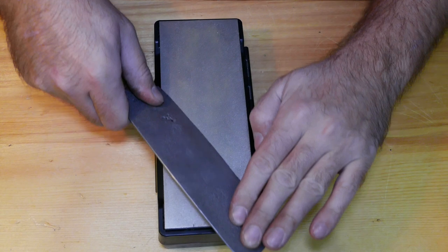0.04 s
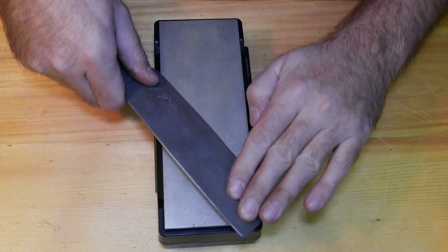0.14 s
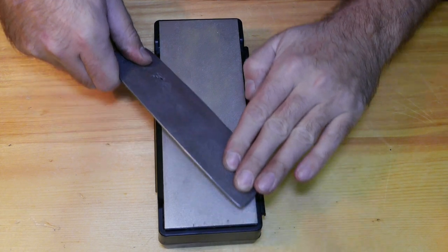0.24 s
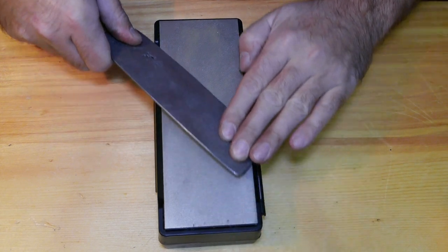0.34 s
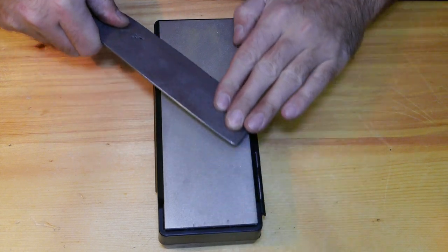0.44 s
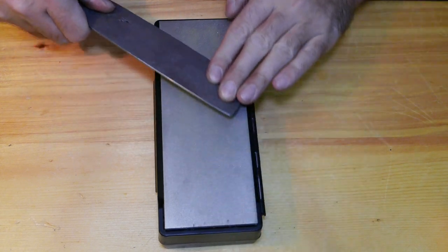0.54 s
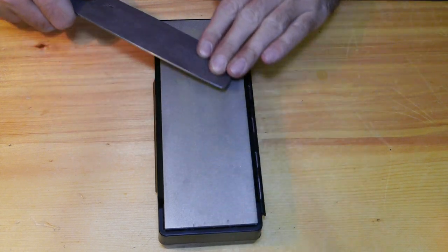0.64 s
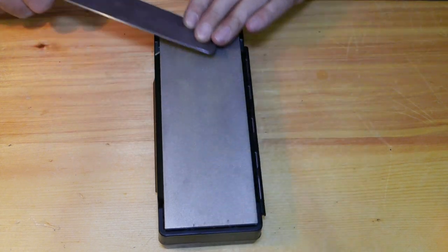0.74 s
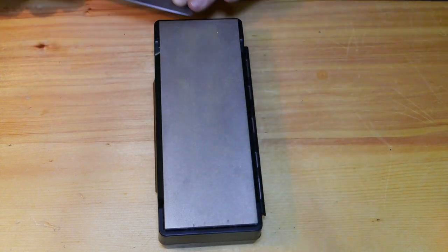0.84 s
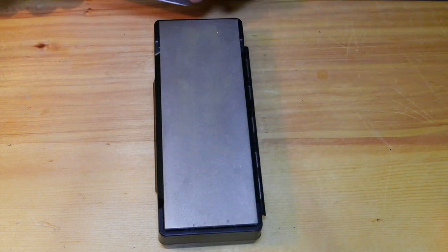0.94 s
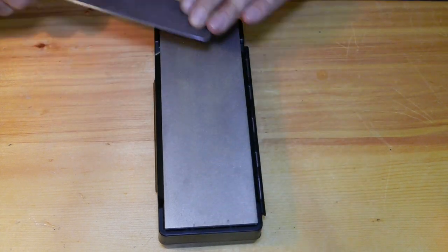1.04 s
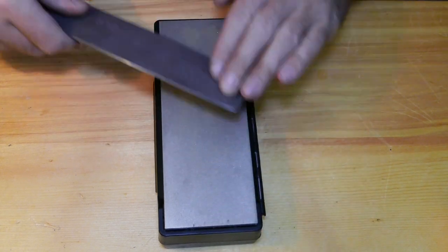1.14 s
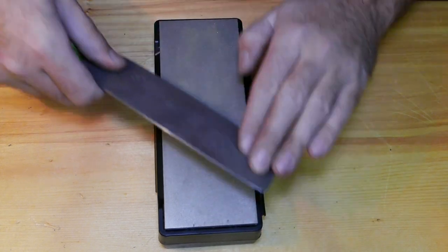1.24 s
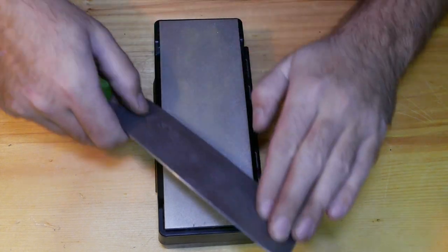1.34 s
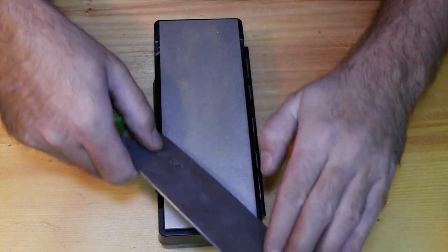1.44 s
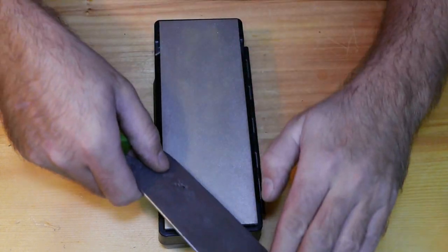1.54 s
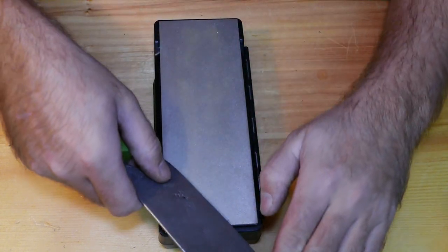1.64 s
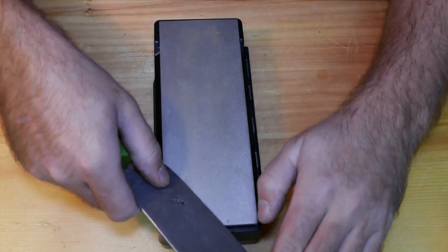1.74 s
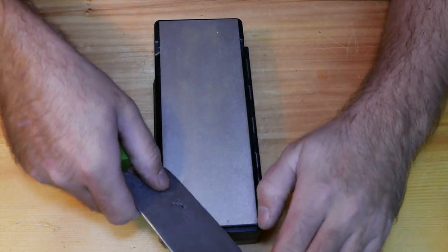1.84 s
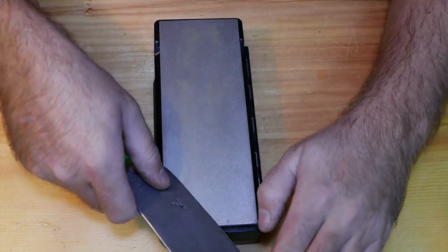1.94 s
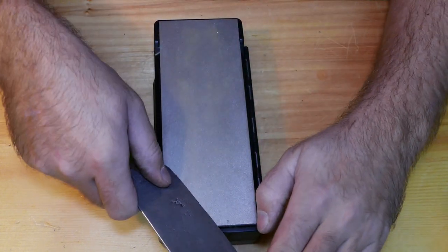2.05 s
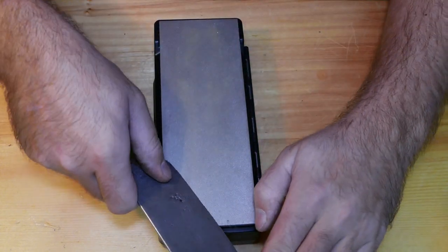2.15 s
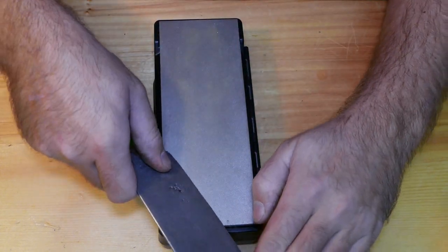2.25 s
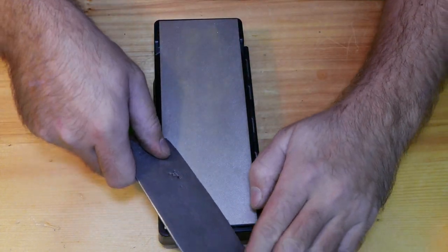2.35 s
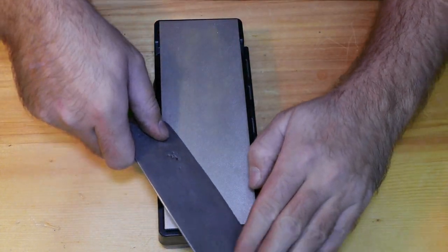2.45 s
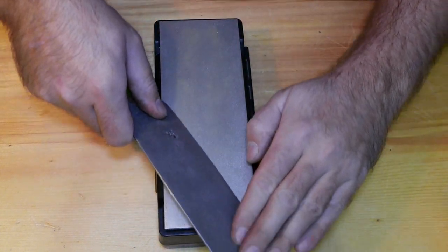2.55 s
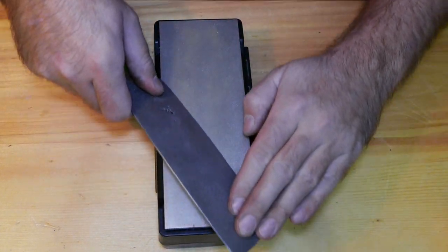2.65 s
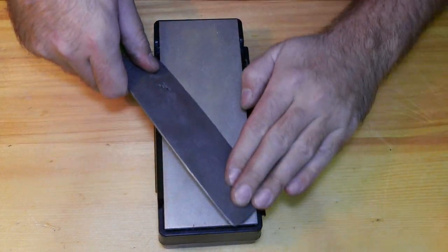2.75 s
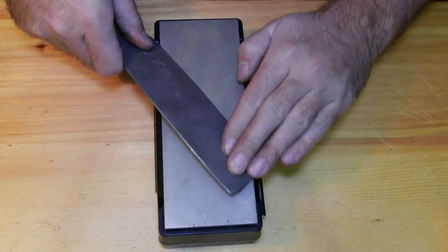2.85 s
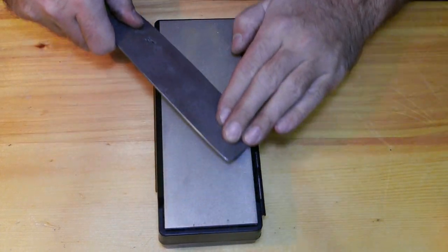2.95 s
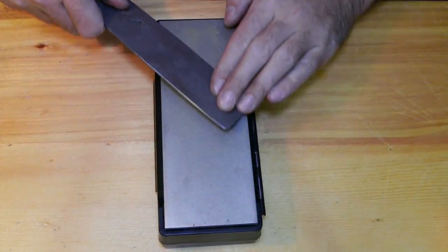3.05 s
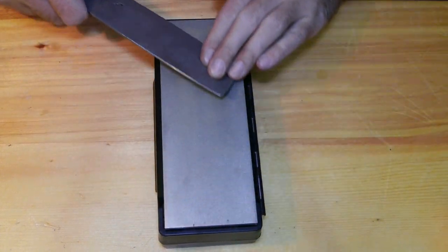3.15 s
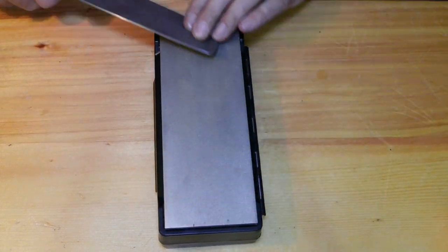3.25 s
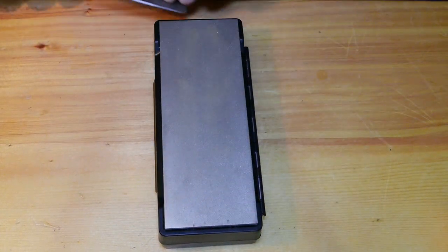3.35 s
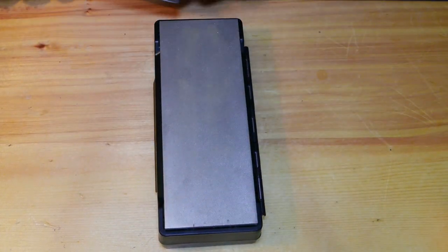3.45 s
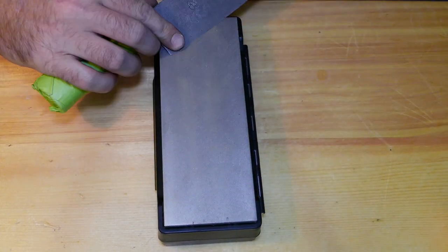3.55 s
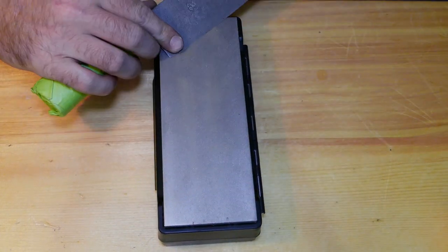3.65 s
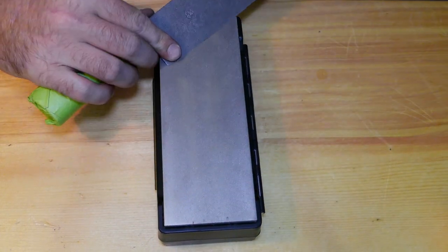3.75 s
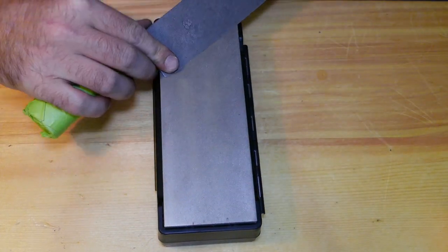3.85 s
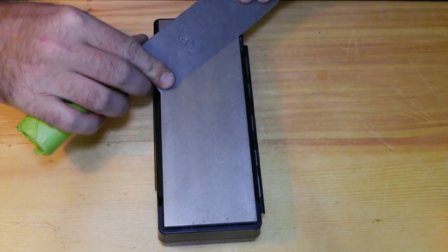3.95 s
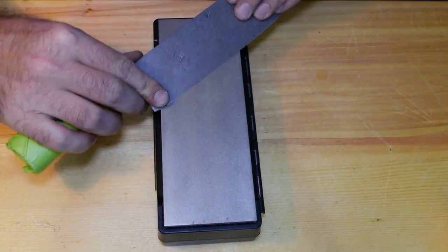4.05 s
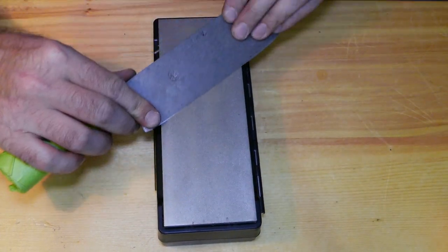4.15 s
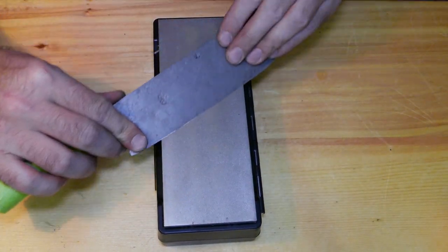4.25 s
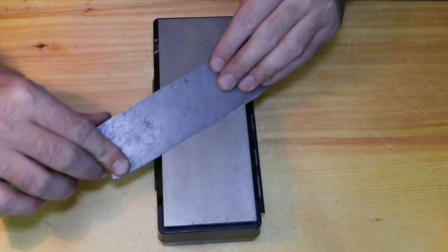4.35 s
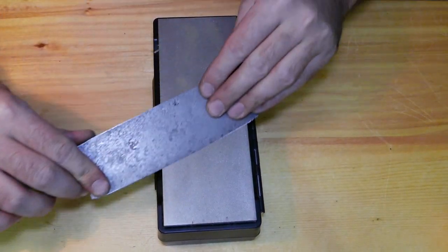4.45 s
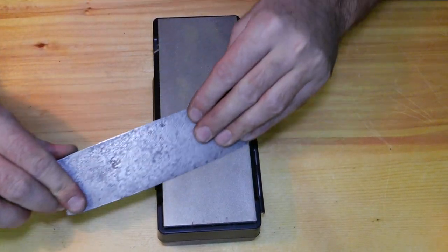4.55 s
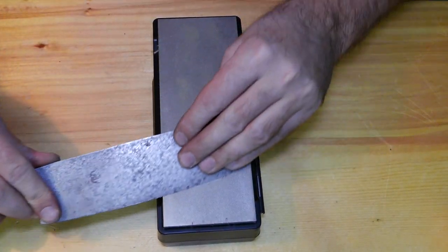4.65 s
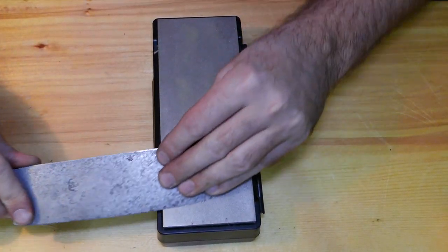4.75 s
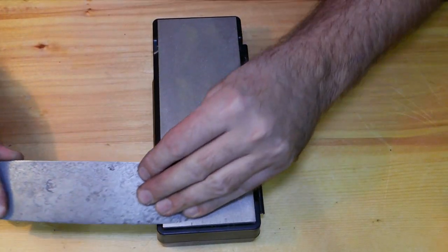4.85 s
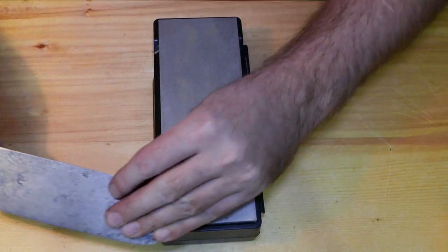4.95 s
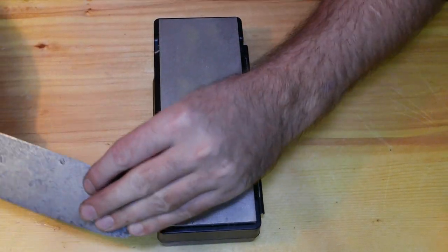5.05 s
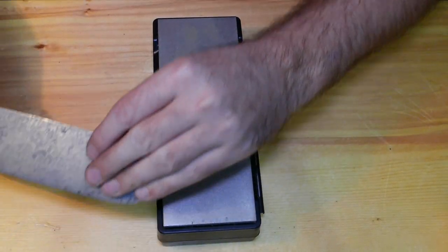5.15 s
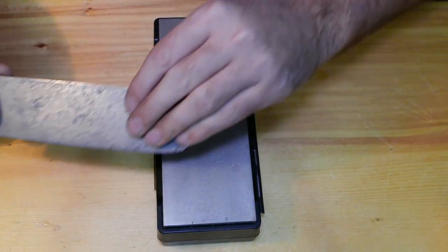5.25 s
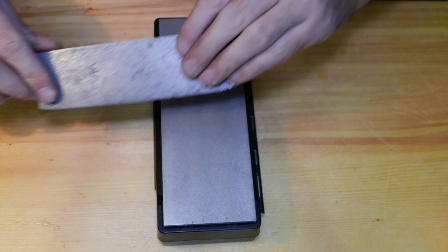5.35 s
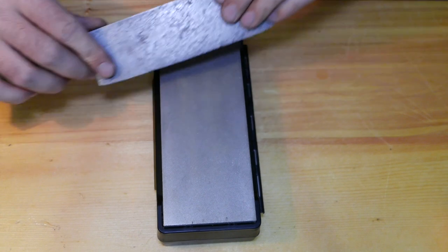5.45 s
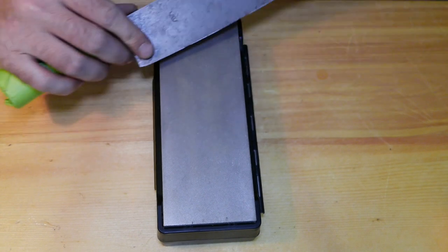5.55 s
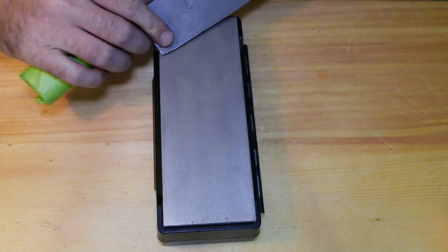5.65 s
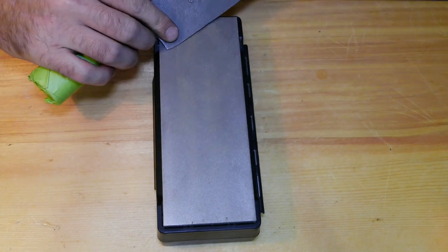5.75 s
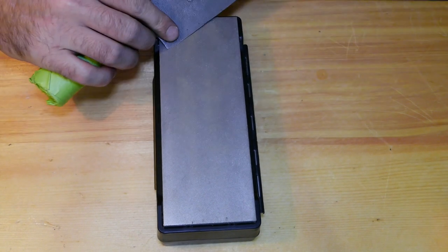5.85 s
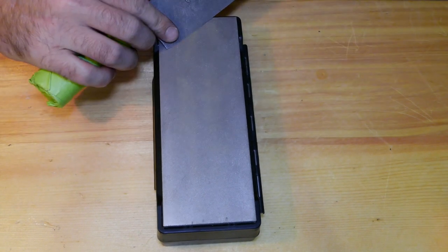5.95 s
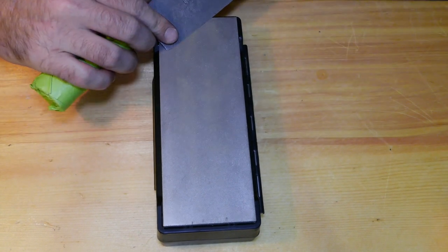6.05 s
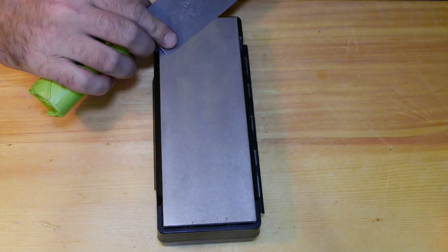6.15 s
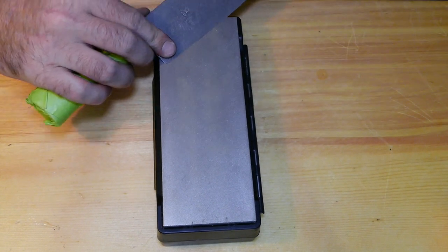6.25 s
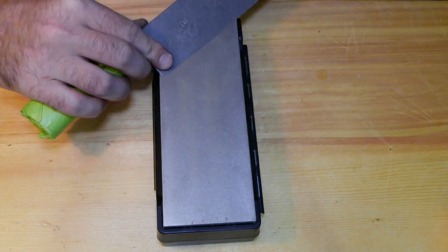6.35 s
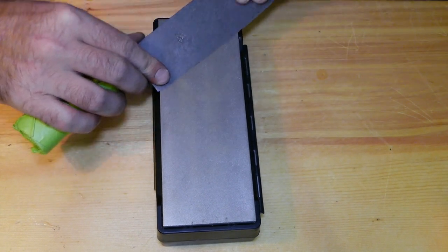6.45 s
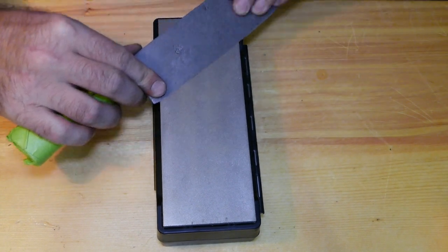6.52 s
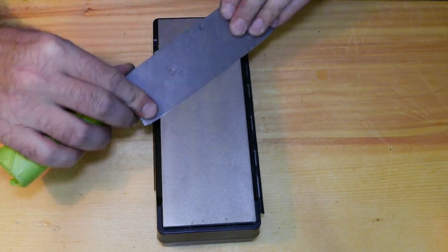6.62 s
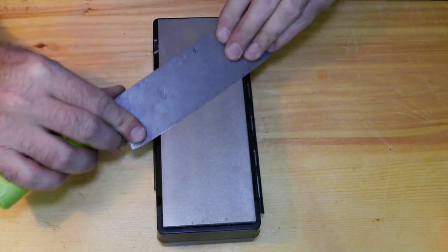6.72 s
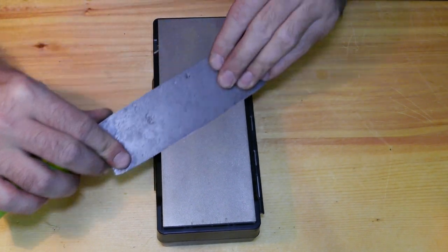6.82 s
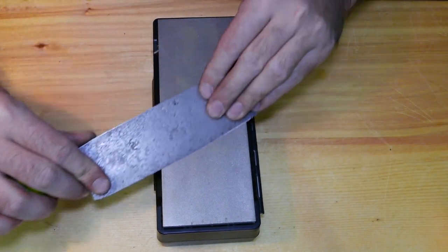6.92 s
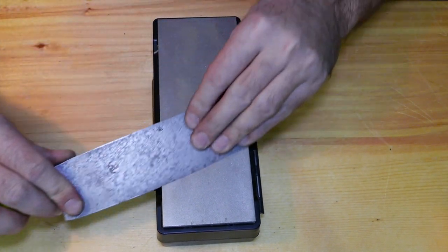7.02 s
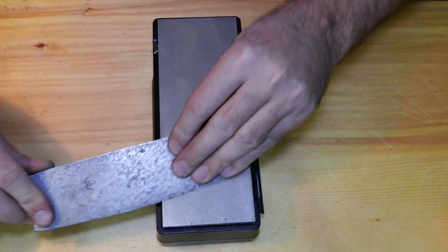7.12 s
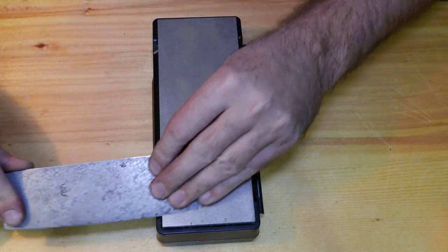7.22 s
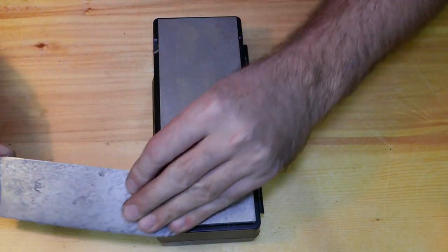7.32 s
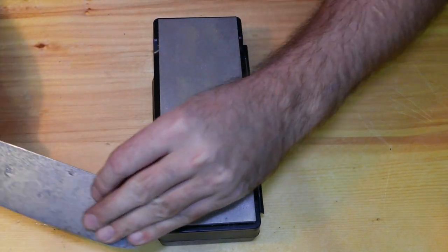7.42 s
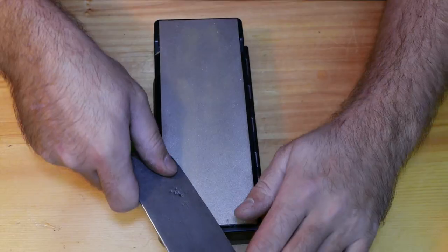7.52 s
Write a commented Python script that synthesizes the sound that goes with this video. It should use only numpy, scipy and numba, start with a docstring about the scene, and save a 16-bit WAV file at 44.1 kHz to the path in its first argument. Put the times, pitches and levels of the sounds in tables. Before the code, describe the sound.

Slow metallic rasps of a blade on a diamond plate, ringing and squeaking toward the tip, with small knocks and a soft room rush between.

```python
"""A steel kitchen knife is drawn heel to tip over a diamond plate on a wooden bench, twice on each face.
Random grit plucks excite the blade's resonances, which shift as the contact travels towards the tip.
The edge squeals now and then; filtered plucks make the bench rumble under the plate.
When the knife lands or slips off, decaying tones ring the blade and thump the bench, with a noise tick.
The hands rub softly; a small room adds echoes, a fan-like rush of filtered noise and a wavering hum."""
import sys
import numpy as np
from scipy import signal
from scipy.fft import rfft, irfft, next_fast_len
from scipy.io import wavfile
from scipy.ndimage import uniform_filter1d
from numba import njit

SR = 44100
rng = np.random.default_rng(int(sys.argv[2]) if len(sys.argv) > 2 else 0)


def log_audio(samples):
    """Write samples as a 16-bit WAV file to the path given in sys.argv[1]."""
    # one column per channel
    frames = np.atleast_2d(samples).T
    # limit to full scale, then quantise
    limited = np.clip(frames, -1, 1)
    pcm = np.round(limited * 32767).astype(np.int16)
    wavfile.write(sys.argv[1], SR, pcm)


N = 334278
TIME = np.arange(N) / SR  # seconds


def undb(db):
    """Turn decibels into a gain."""
    return 10 ** (np.asarray(db) / 20)


def unit(x):
    """Scale to an rms level of 1."""
    return x / np.sqrt(np.mean(x ** 2))


def ramp(t, start_s, length_s):
    """Rise in a straight line from 0 to 1 over a given time."""
    return np.clip((t - start_s) / length_s, 0, 1)


def walk(count, rate):
    """Smooth random wander with spread 1; rate is in new random values per second."""
    knots = np.arange(count) * rate / SR
    return unit(np.interp(knots, np.arange(count), rng.standard_normal(count)))


def steady(x):
    """Even out the slow level to 1 (over about 40 ms) and keep the grain."""
    slow_power = uniform_filter1d(x ** 2, size=1765)
    return x / np.sqrt(slow_power + 1e-18)


def colour(x, points):
    """Shape the spectrum along (Hz, dB) points, joined by lines on a log pitch scale."""
    size = next_fast_len(x.shape[-1])
    hz, db = np.transpose(points)
    bins_hz = np.arange(size // 2 + 1) * SR / size
    gain = undb(np.interp(np.log(bins_hz + 1), np.log(hz), db))
    return irfft(rfft(x, size) * gain, size)[..., :x.shape[-1]]


@njit
def resonate(x, hz, width):
    """A resonance whose centre can move: a state-variable band-pass with gain 1 at the centre."""
    out, band, low = np.empty(len(x)), 0., 0.
    for i in range(len(x)):
        g = np.tan(np.pi * hz[i] / SR)
        damping = width / hz[i]
        v = (band + g * (x[i] - low)) / (1 + g * (g + damping))
        band = 2 * v - band
        low = low + 2 * g * v
        out[i] = damping * v
    return out


def grit(count, grains_per_s=22000, spread_db=1.72, judder_db=0.66, judder_rate=170):
    """Diamond points pluck the edge, a few much harder than the rest; the edge sticks and slips over them."""
    hit = rng.random(count) < grains_per_s / SR
    size = undb(spread_db * np.minimum(rng.exponential(size=count), 5))
    judder = undb(judder_db * walk(count, judder_rate))
    return hit * size * rng.standard_normal(count) * judder


def overtones(count=100, reach=0.036, width_hz=95, low_lift_db=5.5, high_lift_db=10.0,
              tip_lift_db=3.0, glide_hz=1200, tip_fall_hz=4500, scatter_hz=90):
    """Many weaker high modes, each on a short stretch of edge; near the tip they sing out and slide down."""
    places, slopes, shifts = rng.uniform([0, -1, -1], 1, (count, 3)).T
    centres = np.linspace(3300, 14600, count) + scatter_hz * shifts
    near_tip = ramp(places, .7, 0.13)  # along the edge here, not in time
    lifts = np.interp(centres, [4500, 8000], [low_lift_db, high_lift_db]) + tip_lift_db * near_tip
    glides = glide_hz * slopes - tip_fall_hz * near_tip * rng.random(count)
    # same columns as the blade faces in strokes()
    return [(place, reach, hz, glide, width_hz, db)
            for place, hz, glide, db in zip(places, centres, glides, lifts)]


def scrape(place, face, hiss_db, direct_db):
    """Grit excites the blade; each resonance swells and glides as the contact passes its place."""
    # Colour of the scrape as a whole. Each row: pitch in Hz, level in dB.
    steel_colour = [(300, -41.5), (560, -11), (750, -9), (1100, -1.86), (2500, -0.74), (3800, -2),
                    (5200, 0), (6300, -0.3), (7400, -5.5), (8300, -4.5), (9900, 0), (12500, -3),
                    (14500, -7), (16000, -14.8)]
    plucks = grit(len(place))
    steel = undb(direct_db) * plucks
    for best, reach, hz, glide, width, db in face:
        near = np.abs(place - best) < 3.5 * reach
        offset = place[near] - best
        swell = np.exp(-.5 * (offset / reach) ** 2)
        centre = np.clip(hz + glide * offset, 300, 15000)
        steel[near] += (undb(db) - 1) * resonate(plucks[near] * swell, centre, float(width))
    steel = colour(steel, steel_colour)
    # the blade's body sings below 6.8 kHz; the cutting points hiss above it
    body = signal.sosfiltfilt(signal.butter(6, 6800, fs=SR, output="sos"), steel)
    return steady(body) + undb(hiss_db) * steady(steel - body)


def catches(t):
    """The edge bites harder for a moment, or skips: short smooth bumps in dB for blade and bench."""
    # Moments of catching or skipping. Each row: middle in seconds, length in seconds,
    # change of the blade in dB, change of the bench in dB.
    moments = [(0.36, 0.16, 1.5, 0), (0.5, .06, 0, 0), (0.588, 0.04, -2, -4), (0.625, .025, 0, -3),
               (2.153, .04, -5, -7), (2.196, .04, 4.5, -0.5), (2.238, 0.043, 0, -6), (2.28, 0.072, 4, 1),
               (2.394, 0.13, 0.5, -3.5), (2.596, 0.017, 4, -4), (2.91, 0.026, 2.5, -2),
               (3.223, .025, 3, -5), (3.713, 0.11, -10, -0.5), (3.816, 0.065, 0.5, 2),
               (4.224, 0.02, -1, -9), (4.307, 0.041, 0, 2.5), (4.442, 0.038, -4, -2),
               (4.63, 0.047, 0, -3.5), (4.817, 0.051, -1, 7), (4.91, 0.068, -1, 6),
               (4.977, 0.027, 3.5, 1.5), (6.17, 0.085, 1, 0.5), (6.345, 0.11, 4, -1), (6.854, 0.052, 3, 2),
               (7.217, 0.058, 2.5, 1)]
    return sum(np.outer(lifts, np.exp(-(2 * (t - s) / length_s) ** 2))
               for s, length_s, *lifts in moments)


def bench_rumble(count, wood, groan_db, eased):
    """Grit shakes the bench through the plate; the plate holder groans as the weight reaches its end."""
    # Colour of the groan. Each row: pitch in Hz, level in dB.
    groan_colour = [(100, -38.5), (200, -11), (270, 3), (315, -8.5), (420, -16.5), (700, -35.5),
                    (2000, -59)]
    groan = undb(groan_db) * eased * steady(colour(grit(count), groan_colour))
    return steady(colour(grit(count), wood)) + groan


def strokes():
    """Four passes from heel to tip; speed and pressure set the blade's scrape, its hiss and the rumble."""
    # A stroke swells as the hand speeds up, holds, eases as the handle lifts for the curve of the edge,
    # and flares as the tip bites. Each row: touch in seconds, length in seconds, swell in seconds,
    # swell exponent, scrape level in dB, easing starts this many seconds before the end,
    # easing lasts in seconds, easing change in dB, holder's groan in dB relative to the rumble,
    # tip flare in dB, flare rises in seconds, flare holds in seconds, hiss in dB relative to the scrape,
    # the same in the flare, release in seconds, first and last place from heel 0 to tip 1,
    # lead at mid-stroke in edge lengths.
    passes = [(-.46, 1.32, 0.77, 1.7, -22.5, 0.22, 0.034, -7.5, -9.5, 5.9, 0.082, 0.026, -7.5, -2.5, 0.0067, 0.036, 0.97, -0.0088),
              (2.1, 1.269, 0.9, 1.77, -21.5, 0.13, 0.0073, -8, -14, 7.2, 0.071, 0.005, -7.5, 3.5, 0.0039, 0.0039, 0.96, -0.0066),
              (3.66, 1.3725, 0.64, 1.15, -23.5, 0.34, 0.16, -6.5, 0, 7.8, 0.07, 0.015, -7, -6.5, 0.025, 0.052, 0.95, 0.029),
              (6.135, 1.337, 0.8, 1.38, -21.5, 0.42, 0.27, -10, -1, 7, 0.05, 0.058, -6.5, -6, 0.0032, 0.062, 0.99, 0.00059)]
    # Blade resonances on each face. Each row: place where strongest from heel 0 to tip 1,
    # reach in edge lengths, pitch there in Hz, glide in Hz per edge length, width in Hz, lift in dB.
    first_face = [(0.876, 0.026, 760, 760.5, 95, 9.5), (0.1, 0.21, 820, -510, 160, 16.5),
                  (0.424, 0.05, 894, 1900, 100, 13), (0.6, 0.044, 1070, 500, 80, 10),
                  (0.69, 0.12, 1170, 460.5, 55, 11), (0.96, 0.077, 1220, 61, 32, 17.5),
                  (0.12, 0.22, 1240, -170, 61, 19.5), (0.15, 0.21, 1240, 620, 90, 16.5),
                  (0.42, 0.14, 1520, 719.5, 100, 18), (0.47, 0.095, 2200, 699, 250, 4.5),
                  (0.636, 0.11, 1540, -690, 56, 12), (0.9, 0.026, 1850, -2360, 200, 11.5),
                  (0.26, 0.28, 1960, 424.5, 120, 6.5), (0.15, 0.17, 2010, 569, 34, 16.5),
                  (0.52, 0.13, 2450, 412, 310, 8), (0.83, 0.039, 2776, -2500, 130, 17.5),
                  (0.18, 0.16, 2850, 499.5, 92, 13), (0.52, 0.07, 2960, 499, 89, 15.5),
                  (0.71, 0.08, 3020, -81, 62, 13), (0.91, 0.028, 3290, -970, 150, 12.5),
                  (0.777, 0.035, 3490, 0, 100, 12), (0.23, 0.05, 3620, 210, 76, 14),
                  (0.93, 0.054, 3830, -2080, 360, 12.5), (0.81, 0.05, 4130, -300, 120, 12.5),
                  (0.87, 0.035, 4300, -3500, 65, 12), (0.86, 0.049, 5150, -3500, 90, 9.5),
                  (0.87, 0.025, 3450, -3000, 63, 12.5), (0.49, 0.074, 4620, 599.5, 90, 16.5),
                  (0.46, 0.2, 5740, 99, 260, 9.5), (0.66, 0.063, 5830, -500, 300, 7),
                  (0.14, 0.065, 5750, -51, 120, 11.5), (0.806, 0.05, 5800, 930.5, 98, 13.5),
                  (0.65, 0.077, 7100, 369, 450, 8), (0.15, 0.33, 8400, 100.5, 250, 10.5),
                  (0.16, 0.3, 9100, 719.5, 350, 8), (0.72, 0.085, 10540, 1314.5, 190, 13.5),
                  (0.57, 0.06, 8900, -1, 200, 8.5), (0.68, 0.14, 7600, -0.5, 400, 4.5),
                  (1, 0.037, 9000, 1, 230, 13.5)]
    second_face = [(0.19, 0.61, 705, -460, 132, 15.4), (0.32, 0.026, 800, 180.5, 170, 9.5),
                   (0.01, 0.11, 1100, 224, 730, 17.7), (0.83, 0.035, 964, -9, 74, 7.8),
                   (0.16, 0.41, 1160, 100, 154, 9.2), (0.895, 0.08, 1187, 199, 95, 16),
                   (0.33, 0.088, 1540, 679, 290, 14.2), (0.14, 0.13, 1930, 152, 110, 9),
                   (0.28, 0.129, 1990, 382, 80, 16), (0.9, 0.035, 1820, 1680, 340, 7.1),
                   (0.55, 0.11, 2100, -510, 220, 16.7), (0.686, 0.056, 2170, -1000, 73, 19.8),
                   (0.43, 0.072, 2490, 90, 180, 15.4), (0.74, 0.054, 2734, -530, 145, 18.6),
                   (0.24, 0.14, 2770, -400, 140, 13.6), (0.52, 0.16, 2900, 99, 190, 13.5),
                   (0.89, 0.024, 3314, 754, 400, 11), (0.82, 0.075, 3800, -1710, 210, 9.2),
                   (0.14, 0.23, 3200, -360, 140, 8.4), (0.27, 0.067, 3930, 16, 66, 16),
                   (0.14, 0.12, 9750, 0, 340, 6.7), (0.63, 0.084, 4400, 269, 340, 5.5),
                   (0.626, 0.057, 5150, 3000, 300, 10), (0.26, 0.13, 5500, 700, 200, 9.5),
                   (0.796, 0.04, 4570, 0, 180, 8.1), (0.73, 0.026, 5640, 2500, 200, 13.3),
                   (0.64, 0.042, 7900, 230, 180, 4.1), (0.68, 0.12, 8700, 2230, 89, 3.3),
                   (0.855, 0.03, 12780, -1360, 300, 12)]
    # Colour of plate holder and bench top under each face's grip. Each row: pitch in Hz, level in dB.
    first_bench = [(30, -35.5), (60, -41), (90, -15), (112, -18), (142, 1.5), (175, 1), (205, -4), (232, 1),
                   (278, 1), (325, -11.5), (375, -8.5), (470, -7.5), (600, -31.5), (1200, -42)]
    second_bench = [(30, -35), (60, -36), (88, -20.5), (108, -11), (135, 2.5), (168, 1.5), (205, -6.5),
                    (232, -2), (272, -3), (322, -19.5), (375, -13), (470, -15), (600, -18), (1200, -47)]
    first_touch = 0.054  # share of the full scrape amplitude before the hand speeds up
    land_s, bench_land_s = 0.047, 0.062  # blade and bench sounds fade in as the edge settles
    skim_hiss_db, skim_s = 6.5, 0.1  # extra hiss, fading out, while the edge only skims the grit
    bare_db, bare_flare_db = -1, -3  # plucks between the resonances; their change as the tip bites
    hiss_speed_db, eased_hiss_db = 2, -2.5  # change at full speed; level under eased pressure
    rumble_db, rumble_speed_db, lean_db = -36, -3, 0.5  # at rest; change at full speed, as handle lifts
    waver_db, rumble_waver_db, waver_rate = 0.71, 1.85, 36  # unsteady hand pressure; changes per second

    blade, bench = np.zeros(N), np.zeros(N)
    grips = 2 * [(first_face, first_bench)] + 2 * [(second_face, second_bench)]
    for row, (face, wood) in zip(passes, grips):
        (touch, length, swell_s, power, db, ease_lead_s, ease_s, ease_db, groan_db,
         flare_db, rise_s, hold_s, grit_hiss_db, tip_hiss_db, release_s, first, last, lead) = row
        end = touch + length
        span = (TIME >= touch) & (TIME < end + 10 * release_s)
        t = TIME[span]
        # the hand's motion
        progress = ramp(t, touch, length)
        place = first + (last - first) * progress + lead * np.sin(np.pi * progress)
        speed = ramp(t, touch, swell_s)
        eased = ramp(t, end - ease_lead_s, ease_s)
        flare = ramp(t, end - hold_s - rise_s, rise_s)
        release = np.exp(-np.maximum(t - end, 0) / release_s)
        bite_db, shudder_db = catches(t)
        # the blade
        drive = ramp(t, touch, land_s) * (first_touch + (1 - first_touch) * speed ** power)
        blade_db = db + ease_db * eased + flare_db * flare + bite_db
        blade_db = blade_db + waver_db * walk(len(t), waver_rate)
        hiss_db = (1 - eased) * (grit_hiss_db + hiss_speed_db * speed)
        hiss_db = hiss_db + (eased - flare) * eased_hiss_db + flare * tip_hiss_db
        hiss_db = hiss_db - bite_db / 2  # a catch rings the blade more than it adds hiss
        skim_db = skim_hiss_db * (1 - ramp(t, touch, skim_s))
        direct_db = bare_db + bare_flare_db * flare
        steel = scrape(place, list(face) + overtones(), hiss_db + skim_db, direct_db)
        blade[span] += drive * release * undb(blade_db) * steel
        # the bench
        bench_db = rumble_db + rumble_speed_db * speed + lean_db * eased + shudder_db
        bench_db = bench_db + rumble_waver_db * walk(len(t), waver_rate)
        rumble = bench_rumble(len(t), wood, groan_db, eased)
        bench[span] += ramp(t, touch, bench_land_s) * release * undb(bench_db) * rumble
    return blade, bench


def squeals(evenness=0.77):
    """Stick and slip lock on to one blade resonance: a short, rough squeal that swells and breaks off."""
    # Squeals in mid-stroke and as the tip bites. Each row: peak in seconds, rise in seconds,
    # fall in seconds, pitch in Hz, glide in Hz per second, width in Hz, level in dB.
    squeal_rows = [(.03, 0.068, .08, 1544, 200, 70, -31), (.1, .04, 0.047, 908, 1300, 70, -32),
                   (.32, .1, .07, 1615, 0, 70, -29), (.32, 0.063, .05, 3000, 0, 100, -31.5),
                   (.4, .06, 0.037, 5880, 0.5, 250, -30), (0.547, .018, 0.018, 2955, 0, 70, -19.5),
                   (.625, .02, 0.015, 2780, -1500, 110, -26.5), (.745, .035, 0.02, 6070, -4000, 110, -37),
                   (.755, .04, 0.04, 3280, -3000, 130, -35), (.825, .03, 0.017, 3480, 3002, 700, -35),
                   (.835, .05, 0.016, 1205, 2, 70, -26), (2.72, .06, 0.054, 4610, 502, 130, -31.5),
                   (3.15, .04, 0.036, 3440, -2000, 260, -28), (3.22, .025, .018, 2800, -6000, 130, -26.5),
                   (3.224, .03, 0.013, 1240, -1, 90, -33.5), (3.305, .025, 0.029, 3200, 998, 130, -31.5),
                   (3.335, .02, 0.022, 6300, 0, 130, -28.5), (3.355, .015, .012, 1700, 0, 200, -30),
                   (3.81, .025, 0.03, 1950, 0, 110, -40), (3.95, .13, 0.17, 5610, 700, 280, -37.5),
                   (4.24, .05, 0.05, 2460, 0, 320, -29), (4.3, 0.066, .04, 2140, 0, 100, -33),
                   (4.53, 0.028, 0.065, 5220, 0, 240, -25.5), (4.6, 0.064, .07, 2150, 0, 90, -34),
                   (4.66, .03, .03, 2760, 0, 110, -32.5), (4.92, 0.041, .04, 1227, 0, 90, -33.5),
                   (5.005, .04, 0.031, 1232, 0, 100, -27), (5.018, .04, 0.017, 3244, 0, 150, -21.5),
                   (5.026, .025, 0.012, 3860, 1500, 320, -19.5), (6.991, .05, 0.062, 5620, 0, 200, -24),
                   (7.145, .035, 0.053, 6100, -5, 230, -31), (7.2, 0.078, .08, 1216, -4, 70, -39),
                   (7.212, .03, 0.018, 2005, -3, 130, -30.5), (7.428, .025, 0.029, 3310, -3, 220, -19.5),
                   (7.43, .04, 0.032, 3830, -2, 375, -25), (7.455, .03, 0.014, 810, 3, 70, -30.5),
                   (7.455, .045, 0.017, 1233, -5, 70, -18.5)]
    out = np.zeros(N)
    for s, rise_s, fall_s, hz, glide, width, db in squeal_rows:
        span = (TIME > s - 3 * rise_s) & (TIME < s + 3 * fall_s)
        t = TIME[span] - s
        centre = hz + glide * t
        plucks = grit(SR)[:len(t)]
        tone = resonate(resonate(plucks, centre, float(width)), centre, float(width))
        # slipping limits the swing, so the squeal holds its level
        swing = np.abs(signal.hilbert(unit(tone)))
        tone = tone / (swing + .3) ** np.clip(evenness, 0, 1)
        swell = np.exp(-(t / np.where(t < 0, rise_s, fall_s)) ** 2)
        out[span] += undb(db) * swell * steady(tone)
    return out


def reflections(x, db, delay_s=0.0055, size=4096):
    """Quick echoes off bench top and hands, different in each ear; the pattern changes as the knife moves."""
    # Colour of the near reflections. Each row: pitch in Hz, level in dB.
    echo_colour = [(200, -5), (600, 7.5), (1300, 0.5), (4500, 0.5), (9000, 1), (13500, 7.5)]
    t = np.arange(size // 2) / SR
    padded, out = np.pad(x, (size, 2 * size)), np.zeros((2, N + 4 * size))
    fade = np.sin(np.pi * np.arange(2 * size) / (2 * size))
    # a new random pattern about every 93 ms, each block crossfading into the next
    for i in range(0, N + size, size):
        shape = t * np.exp(-2 * t / delay_s)
        response = unit(rng.standard_normal((2, len(t))) * shape) / np.sqrt(len(t))
        block = (fade * padded[i:i + 2 * size])[None]
        echo = signal.fftconvolve(block, colour(response, echo_colour), axes=1)
        out[:, i:i + echo.shape[1]] += echo
    return undb(db) * out[:, size:size + N]


def room(x, early_db, late_db, t60, build_s=0.0035, treble_t60=0.27, treble_db=3, split_hz=6000):
    """The direct sound, its near reflections and the room's tail, whose treble dies first."""
    t = np.arange(SR // 2) / SR
    noise = rng.standard_normal((2, len(t)))
    low = signal.sosfiltfilt(signal.butter(2, split_hz, fs=SR, output="sos"), noise)
    # t60 is the time in seconds to fall by 60 dB
    tail = low * undb(-60 * t / t60) + (noise - low) * undb(treble_db - 60 * t / treble_t60)
    tail = tail * (1 - np.exp(-t / build_s))
    response = undb(late_db) * unit(tail) / np.sqrt(len(t))
    late = signal.fftconvolve(x[None], response, axes=1)[:, :N]
    return x + reflections(x, early_db) + late


def rush(level_db=-50.5, side_db=-4, bass_side_db=-14, waver_db=1.46):
    """A fan-like rush of coloured noise that wavers slightly; its bass is nearly alike on both sides."""
    # Colour of the rush. Each row: pitch in Hz, level in dB.
    rush_colour = [(25, -26), (50, -22), (90, -3), (150, 3), (270, -3), (430, 1.5), (540, -1.5), (750, -1),
                   (1100, -11.5), (1500, -8), (2400, -12), (2740, -10.5), (2880, -3), (3100, -17.5),
                   (3500, -23.5), (4200, -28), (7500, -31.5), (10000, -29), (15500, -34)]
    mid, side = (unit(colour(rng.standard_normal(N), rush_colour)) for _ in range(2))
    side = colour(side, [(200, bass_side_db), (600, side_db)])
    level = undb(level_db + waver_db * walk(N, 3.9))
    return level * (mid + side * np.array([[1], [-1]]))


def hum(drift_hz=3.46, waver_db=2.5):
    """The fan-like hum: a few sine tones, each wavering slightly in pitch and level."""
    # Tones of the hum. Each row: pitch in Hz, rms level in dB.
    hum_tones = [(151, -66), (403.7, -60), (473.7, -65.5), (748, -67), (866.7, -67)]
    out = np.zeros(N)
    for hz, db in hum_tones:
        level = undb(db + waver_db * walk(N, 7)) * np.sqrt(2)
        phase = 2 * np.pi * np.cumsum(hz + drift_hz * walk(N, 11)) / SR
        out += level * np.sin(phase)
    return out


def ring(modes, t):
    """Tones that die away after a blow at t = 0."""
    return sum(undb(db - 60 * t / t60) * np.sin(2 * np.pi * hz * t) for hz, db, t60 in modes)


def blade_ring(place, t, split=.006, twin_db=-6):
    """The free blade's modes, each beating with a close twin; where it is struck decides which sound."""
    # Modes of the free blade. Each row: pitch in Hz, level in dB struck at the heel,
    # level in dB struck at the tip, time to fall by 60 dB in seconds.
    blade_modes = [(1237, 1, -26, 0.13), (1980, -3.5, -28, 0.38), (3280, -20, -23.5, 0.25),
                   (3700, -27, 4, 0.15), (4080, -11, -18.5, 0.18), (4200, -9, -20, 0.14),
                   (4460, -21, -13, 0.28), (5150, -6, -27, .11), (5240, -11, -23, 0.23),
                   (6550, -15, -25, 0.24), (7780, -25, -22.5, 0.18), (8380, -22.5, -14, 0.23),
                   (8900, -26, -15, 0.16), (9560, -19, -23.5, .27)]
    modes = [(hz, heel + place * (tip - heel), t60) for hz, heel, tip, t60 in blade_modes]
    twins = [(hz * (1 + split * rng.standard_normal()), db + twin_db, t60) for hz, db, t60 in modes]
    return ring(modes + twins, t)


def knocks(tick_s=0.0025, lowest_hz=128, cutoff_fade_s=.025):
    """Each knock ticks and rings the blade and, through a softer push, thumps the bench."""
    # The knife lands on the plate or slips off its end. Each row: start in seconds, thump in dB,
    # blade ring in dB, tick in dB, contact length in seconds, place from heel 0 to tip 1,
    # seconds until the ring is cut short.
    knock_rows = [(0.846, -17, -23, -15.5, 0.0048, 0.96, 0.053), (.863, -49, -45, -33, .003, 0.36, .02),
                  (1.897, -40, -46.5, -47, 0.0004, 0.085, .1), (1.9, -29.5, -66, -49, 0.0005, 0.51, .1),
                  (2.12, -41, -64, -43, 0.0032, 0, .02), (2.16, -48, -50, -31, 0.003, .1, .02),
                  (3.351, -19, -44, -36, 0.0047, 0.99, .02), (3.361, -50, -22, -18, 0.0035, 1, .19),
                  (3.685, -46, -58, -42, .0021, 0.24, .02), (5.046, -37, -23.5, -30, 0.0033, 0.26, 0.17),
                  (5.769, -38.5, -65, -60, 0.0035, .3, .1), (5.874, -27, -64, -60, 0.0044, 0.23, .1),
                  (7.461, -40, -24.5, -35, 0.0024, 0.36, 0.055)]
    # The bench under a blow. Each row: pitch in Hz, level in dB, time to fall by 60 dB in seconds.
    bench_modes = [(120, -26, .1), (161, -3, 0.22), (205, 5.5, 0.077), (262, 0, 0.23), (450, -11.5, .06),
                   (668, -14.5, .16), (1206, -20, .066)]
    # Colour of the tick. Each row: pitch in Hz, level in dB.
    tick_colour = [(80, -28), (200, -11), (600, -0.5), (1400, 0), (3000, -4), (6000, -4.5), (10000, 10),
                   (15000, -10.5)]
    blade, bench = np.zeros(N), np.zeros(N)
    for s, thump_db, ring_db, tick_db, contact_s, place, free_s in knock_rows:
        span = (TIME >= s) & (TIME < s + .5)
        t = TIME[span] - s
        push = np.sin(np.pi * t[t < contact_s] / contact_s)
        thump = np.convolve(ring(bench_modes, t), push / push.sum())[:len(t)]
        bench[span] += undb(thump_db) * thump
        tick = np.exp(-t / tick_s) * colour(rng.standard_normal(len(t)), tick_colour)
        cutoff = np.exp(-np.maximum(t - free_s, 0) / cutoff_fade_s)
        blade[span] += undb(ring_db) * cutoff * blade_ring(place, t) + undb(tick_db) * tick
    # the bench top is too small to radiate deep bass
    return blade, signal.sosfilt(signal.butter(5, lowest_hz, "high", fs=SR, output="sos"), bench)


def hand_friction(rows, points):
    """Soft friction of the hands on the knife: coloured grit, fading in and out."""
    level = np.zeros(N)
    for s, length_s, fade_s, db in rows:
        fade_out = 1 - ramp(TIME, s + length_s - fade_s, fade_s)
        level += undb(db) * ramp(TIME, s, fade_s) * fade_out
    return level * unit(colour(grit(N), points))


def skin_hiss():
    """Faint hiss of skin on the handle as the knife is carried back and the grip is reset."""
    # Hisses. Each row: start in seconds, length in seconds, fade in seconds, level in dB.
    skin_rows = [(.9, 0.71, 0.17, -70.5), (1.98, 0.27, 0.11, -63), (5.15, 0.78, 0.18, -67.5),
                 (5.8, 0.77, 0.32, -70)]
    # Their colour. Each row: pitch in Hz, level in dB.
    skin_colour = [(1500, -1), (3800, -1), (6300, 2), (7600, -9), (9800, 5), (11800, -2), (12500, -20),
                   (16000, -35)]
    return hand_friction(skin_rows, skin_colour)


def dull_rub():
    """The hands turn or shift the knife with a dull rub."""
    # Rubs. Each row: start in seconds, length in seconds, fade in seconds, level in dB.
    rub_rows = [(5.15, 0.7, 0.077, -56.5), (7.531, .1, .006, -35.5)]
    # Their colour. Each row: pitch in Hz, level in dB.
    rub_colour = [(150, -42), (300, -17), (450, -2.5), (600, -1.5), (850, -17), (1400, -23), (4000, -24),
                  (15000, -33)]
    return hand_friction(rub_rows, rub_colour)


def lull(start_s=3.551, end_s=3.67, depth_db=-7, fall_s=0.0042, return_s=0.027):
    """The level of everything dips briefly between the second and third strokes."""
    return undb(depth_db * (ramp(TIME, start_s, fall_s) - ramp(TIME, end_s, return_s)))


def scene(pan_db=0.5):
    """Blade slightly left, bench in the middle, the room around; knocks ring the blade with less echo."""
    scraping, rumble = strokes()
    rings, thumps = knocks()
    hands = dull_rub() + skin_hiss()
    blade = room(scraping + squeals() + hands, early_db=-8.5, late_db=-9, t60=0.39)
    blade = blade + room(rings, early_db=-10.5, late_db=-14.5, t60=0.29)
    bench = room(rumble + thumps, early_db=-16, late_db=-16.0, t60=.35)
    pan = undb(np.array([[pan_db], [-pan_db]]) / 2)  # pan_db is the difference between the sides
    return lull() * (blade * pan + bench + rush() + hum())


def record(dry, ceiling=0.49, top_hz=15600):
    """The microphone has two narrow dips, rounds the loudest peaks and has a steep top end."""
    # Narrow dips of the microphone. Each row: pitch in Hz, width in Hz.
    dips = [(565, 89), (2675, 120)]
    for hz, width in dips:
        dry = signal.lfilter(*signal.iirnotch(hz, hz / width, fs=SR), dry)
    dry = ceiling * np.tanh(dry / ceiling)
    return signal.sosfilt(signal.ellip(10, .2, 80, top_hz, fs=SR, output="sos"), dry)


dry = scene()
out = record(dry)
log_audio(out)
```